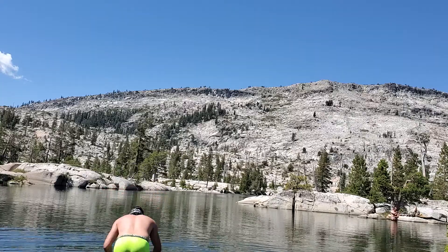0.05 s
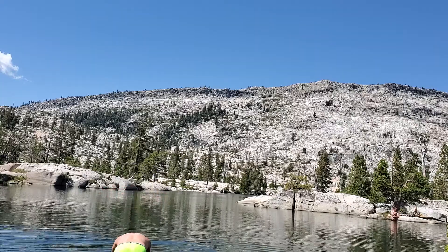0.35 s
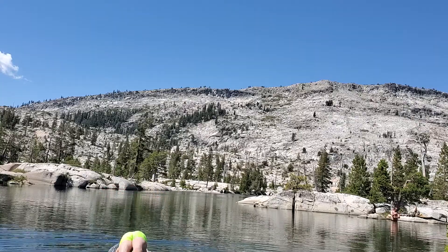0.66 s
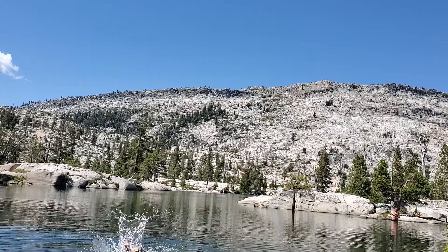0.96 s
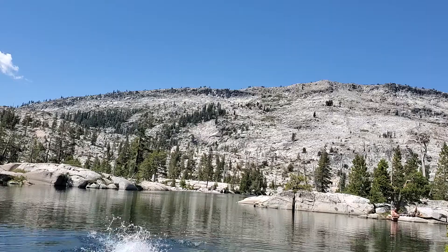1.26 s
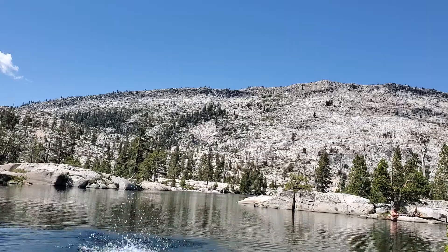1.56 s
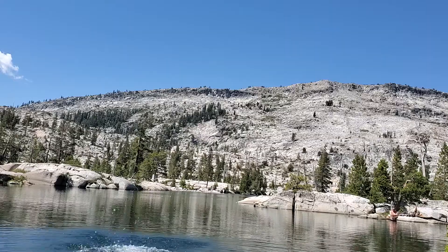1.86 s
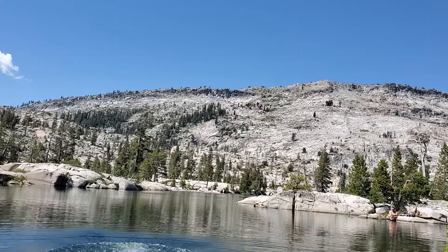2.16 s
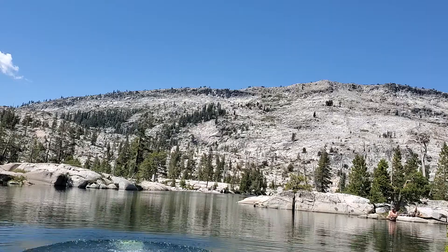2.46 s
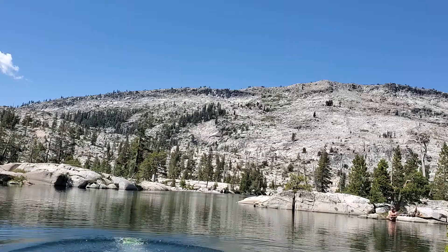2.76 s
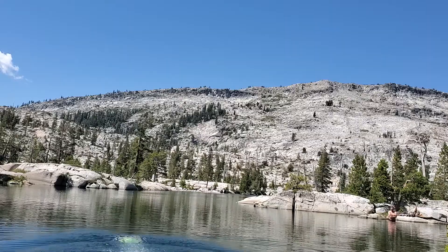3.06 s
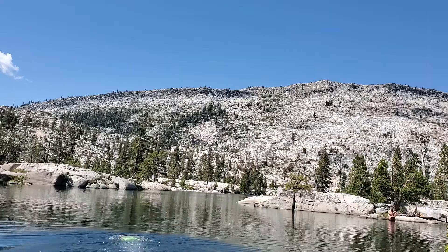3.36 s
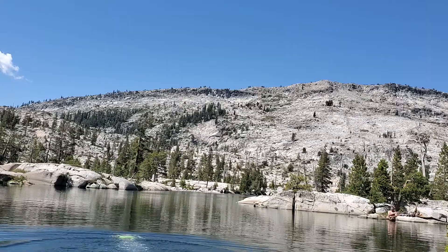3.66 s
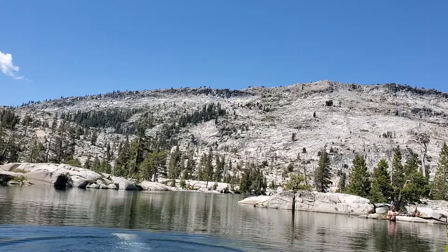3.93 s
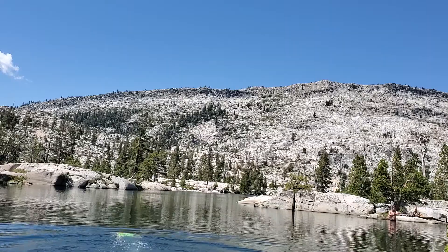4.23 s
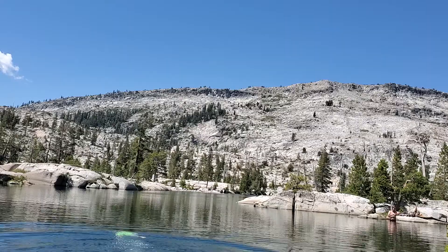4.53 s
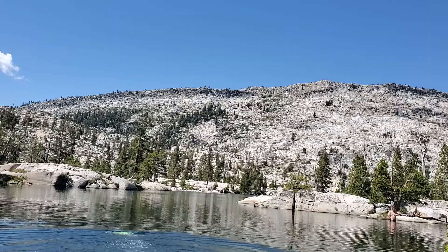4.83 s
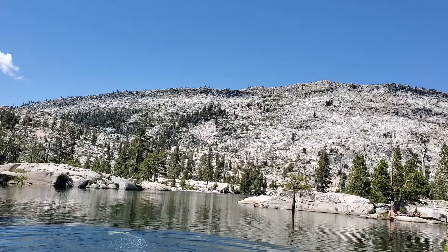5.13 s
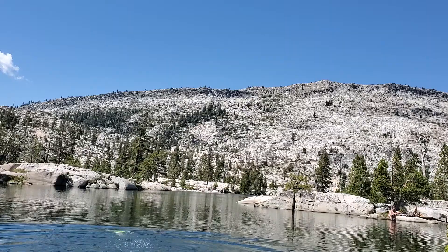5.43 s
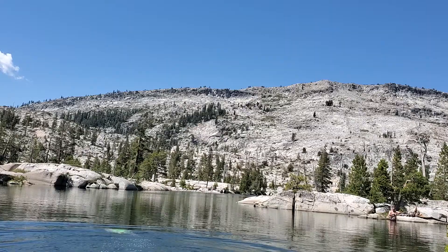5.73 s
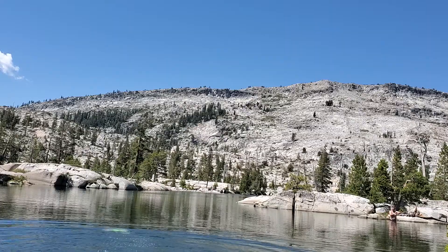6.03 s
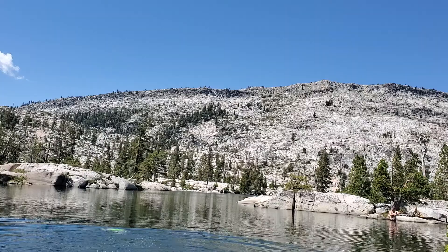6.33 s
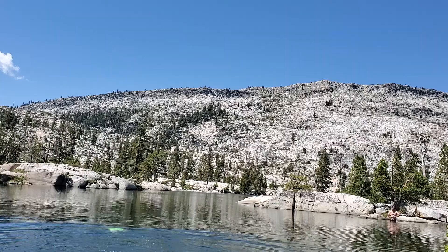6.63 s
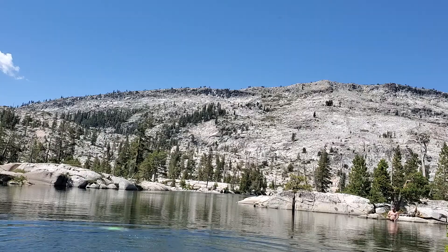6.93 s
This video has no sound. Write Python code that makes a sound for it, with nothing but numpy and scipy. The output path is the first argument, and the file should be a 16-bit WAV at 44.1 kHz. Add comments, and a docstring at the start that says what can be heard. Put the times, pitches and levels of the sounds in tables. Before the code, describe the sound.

Over a low rumble of open air, a person dives headfirst into a mountain lake. The body slaps the surface, the water churns with deep plops and thumps, and fizzing spray patters back down. A few bubbles rise, then faint ripples lap against the rocks. The splash is heard from a few metres away, slightly to the left, with a short, slight echo off the shore.

```python
"""First comes a low rumble of open air, then a person dives headfirst into a mountain lake.
The body slaps in, the air pocket it drags down churns and collapses in thumps, and spray patters back.
Then a few bubbles surface and ripples lap the rocks. Most of the water's sound is trapped air ringing:
big bubbles ring low and long, small ones high and short. Two microphone ports listen a few metres away."""
import sys
import numpy as np
from scipy import signal
from scipy.fft import rfft, irfft, next_fast_len
from scipy.io import wavfile
from scipy.ndimage import uniform_filter1d

SR = 44100
rng = np.random.default_rng(int(sys.argv[2]) if len(sys.argv) > 2 else 0)


def inscribe(sig):
    """Save sig as 16-bit PCM at rate SR to the path in sys.argv[1].

    A 1-D sig is mono; a 2-D sig holds one channel per row.
    Samples are clipped to [-1, 1] before scaling.
    """
    pcm = np.round(np.clip(np.atleast_2d(sig).T, -1, 1) * 32767)
    wavfile.write(sys.argv[1], SR, pcm.astype(np.int16))


N = 317079
TIME = np.arange(N) / SR

# How strong the lows and highs of each sound are. Each row: frequency in Hz, relative level in dB.
RUMBLE_COLOUR = [(15, -48.5), (25, -19.5), (63, -3.5), (94, -0.5), (131, -7.5), (201, -11), (237, -16),
                 (290, -14.5), (328, -17), (411, -17.5), (806, -26.5), (1030, -26), (1790, -27.5),
                 (2800, -35.5), (3300, -48.5), (4290, -76), (7260, -120)]
HISS_COLOUR = [(1940, -35), (3300, -17.5), (3920, -13), (5040, -15.5), (5710, -12.5), (6870, -7),
               (8490, -25.5), (9310, -16), (12800, -7.5), (14400, -6.5), (15200, -3), (16000, -2.5)]
CHURN_COLOUR = [(60, 4), (120, -6.5), (170, -2.5), (260, 0.5), (340, 1.5), (440, 3), (550, -2), (650, -4.5),
                (760, -15.5), (850, -18), (1200, -40)]
SPLASH_COLOUR = [(440, 1), (750, 0), (836, -16), (965, -6.5), (1160, -0.5), (1330, -4), (1430, -1),
                 (1900, -5.5), (2090, -3.5), (2390, -10), (2810, -11.5), (3410, -20), (4200, -21.5),
                 (5460, -29), (9240, -120)]
SPRAY_COLOUR = [(2000, -9), (3400, -7), (4270, -3), (5210, -6), (6670, -6), (7890, -15), (11500, -7),
                (13000, -7), (14500, -2), (15200, 0.5), (16000, -26)]
SLAP_COLOUR = [(100, -15), (250, -8), (550, -9.5), (820, -11), (1150, -7), (2400, -8.5), (3500, -17),
               (8000, -29), (15000, -18)]
LAP_COLOUR = [(450, -5), (700, 8.5), (900, -11), (1300, 3), (2400, 2), (3300, -8), (6000, -9)]
# The hiss comes up with the splash. Each row: time in seconds, change of level in dB.
HISS_RISE = [(0, -4), (.22, -2), (.5, 18), (2.8, 5), (3.8, 1.5), (6.4, 2), (7.15, -1)]
# Single air pockets and bubbles. Each row: start in seconds, relative level in dB, pitch in Hz.
PLOPS = [(.241, -38.5, 1140), (.25, -47, 2980), (.3802, -23.5, 4600), (.382, -33.5, 3000),
         (.435, -25, 2740), (.461, -34, 2400), (.656, -12, 2090), (.651, -30.5, 71), (.705, -26, 85),
         (.767, -16, 1150), (.771, -27, 80), (.797, -14.5, 240), (.830, -18.5, 176), (.845, -15.5, 264),
         (1.051, -17, 420), (1.072, -11.5, 1256), (1.089, -24.5, 54.4), (1.093, -10, 498),
         (1.175, -18.5, 82), (1.275, -15.5, 327), (1.277, -16.5, 51), (1.765, -26.5, 2240),
         (1.913, -33, 1680), (2.132, -27, 2020), (2.294, -32, 2450), (2.486, -40, 2900),
         (5.107, -42.5, 690), (5.244, -49, 2290), (5.659, -43, 2210), (6.338, -46.5, 875),
         (6.617, -40.5, 1980), (6.631, -44.5, 484), (6.633, -42.5, 1510), (6.647, -42, 2220),
         (6.694, -50, 705), (7.156, -41, 1150)]
# The largest drops landing. Each row: start in seconds, relative level in dB, pitch in Hz.
BIG_DROPS = [(.252, -50, 5000), (.331, -45.5, 5000), (.3795, -28.5, 5950), (.4125, -30.5, 13200),
             (.5442, -31, 11800), (.8639, -35, 6500), (1.2211, -24.5, 12400), (1.8367, -32, 13000),
             (1.924, -39, 6040), (1.9789, -37, 4600), (2.089, -38, 5000), (2.1186, -32, 11000),
             (2.2069, -35, 5560), (2.221, -36.5, 6540), (2.3206, -32, 6400), (2.3456, -34, 11000),
             (2.377, -31, 11200), (2.4144, -37, 6450), (2.426, -31.5, 9900), (2.5416, -34.5, 6800),
             (2.605, -24.5, 12600), (2.613, -36, 12600), (2.6375, -41, 11250), (2.6663, -33, 14200),
             (2.7362, -41.5, 12500), (5.659, -52, 8900), (6.609, -44.5, 5740), (6.625, -41, 12500)]
# The slow swell of each splash layer. Each lists: relative level in dB, time it is full in seconds,
# hold in seconds, rise and fall in dB per second.
CHURN_WASH = (-35, 0.6, 0.65, 34.5, 23)
SPLATTER_WASH = (-36.5, 0.516, 1.0746, 30, 30)
SPRAY_WASH = (-48, 1.25, 0.35, 9, 17)
# Surges as the diver pushes off and enters, the air pocket closes and spray falls back. Each row:
# crest in seconds, relative levels of churn, splatter and spray in dB, rise and fall in dB per second.
SURGES = [(.335, -52, -53.5, -75, 110, 44.5), (.615, -29, -34, -44, 260, 130),
          (.663, -35, -26.5, -40, 170, 120), (.783, -23.5, -37, -38.5, 300, 190),
          (.825, -23.5, -41, -58, 260.5, 75), (.965, -27.5, -46, -60, 138.5, 130.5),
          (1.005, -42, -34, -44.5, 230, 34), (1.098, -25.5, -24.5, -50, 130, 240),
          (1.19, -35, -37, -55, 299.5, 90), (1.29, -29.5, -32.5, -49, 330.5, 110),
          (1.84, -50, -45, -60, 160, 110), (2.125, -56, -54, -52.5, 200, 45),
          (2.28, -72.5, -52.5, -59, 170, 110.5), (2.43, -72, -64, -54, 75, 40)]
# Flat blows of body and falling water on the surface. Each row: start in seconds, relative level
# in dB, seconds to fade by 60 dB (called t60 below), frequency in Hz above which it is dulled.
SLAPS = [(0.4365, -32, 0.039, 4970), (.460, -26.5, 0.03, 5030), (0.648, -21.5, 0.038, 6000),
         (0.762, -22.5, 0.046, 12100), (0.767, -19, 0.021, 9000), (1.0728, -21, 0.025, 2200),
         (1.088, -20, 0.045, 1800), (1.103, -17, .025, 1900), (1.285, -21.5, .07, 3000),
         (2.13, -30.5, 0.037, 4000), (6.622, -55, 0.28, 13000)]
# Bubbles nearing the surface. Each row: start and length in seconds, first and last pitch in Hz,
# relative level in dB.
RISING_BUBBLES = [(2.066, .085, 369, 480, -47.5), (2.642, 0.087, 976, 1710, -62.5),
                  (2.759, .038, 548, 1470, -56), (3.125, .08, 361, 1387, -57)]
# Ripples reaching the rocks. Each row: crest in seconds, relative level in dB.
LAPS = [(5.03, -73), (5.28, -68), (5.45, -67.5), (5.70, -69), (5.94, -72), (6.30, -67), (6.65, -62),
        (6.92, -74)]
# Which port is louder. Each row: frequency in Hz, left minus right in dB.
PORT_BALANCE = [(60, 1), (230, 1), (500, 0.5), (770, 0), (1150, 6), (2000, 5), (3200, 9.5), (4300, 0),
                (6000, 1.5), (7100, -5), (8500, 3), (12000, -1.5), (14500, 16.5)]
# How far the left port is ahead. Each row: frequency in Hz, phase lead in radians.
LEFT_LEAD = [(60, 0.087), (400, 0.13), (1000, 1.1), (2200, 1.1), (4000, 1.48)]
# How alike the two ports hear water and air. Each row: frequency in Hz, likeness from 0 to 1.
WATER_LIKENESS = [(100, 1), (500, 1), (1200, 0.68), (2200, 1), (4500, 0.82), (8000, 0.19), (15000, .05)]
AIR_LIKENESS = [(60, 0.98), (240, 0.91), (480, 0.69), (1200, 0.45), (2200, 0.23), (4000, 0.047)]

ENTRY_S, LANDED_S = .48, 2.45  # the water is in uproar from the diver's entry until the spray has landed


def gain_of(db):
    """Turns decibels into a number to multiply a sound by."""
    return 10 ** (np.asarray(db) / 20)


def evened(x):
    """Scales a sound to an average (rms) level of 1."""
    return x / np.sqrt(np.mean(x ** 2) + 1e-20)


def read(table, hz):
    """Looks up a frequency in a table, blending between rows on a pitch-like (log) scale."""
    row_hz, value = np.transpose(table)
    return np.interp(np.log(hz + 1), np.log(row_hz + 1), value)


def filtered(x, response):
    """Multiplies each frequency in a sound by response(hz)."""
    size = next_fast_len(N + 4096, True)
    return irfft(rfft(x, size) * response(np.fft.rfftfreq(size, 1 / SR)), size)[..., :N]


def coloured(x, colour):
    """Shapes a sound's lows and highs with a colour table, at an average level of 1."""
    return evened(filtered(x, lambda hz: gain_of(read(colour, hz))))


def add(mix, s, sound):
    """Mixes a sound in, starting at s seconds."""
    part = mix[:, max(round(s * SR), 0):][:, :sound.shape[-1]]
    part += sound[..., :part.shape[1]]


def swell(s, rise_db_per_s, fall_db_per_s, hold_s=0):
    """A loudness curve that rises to 1 at s seconds, holds, and falls."""
    before, after = np.maximum(s - TIME, 0), np.maximum(TIME - s - hold_s, 0)
    return gain_of(-rise_db_per_s * before - fall_db_per_s * after)


def air(rumble_db=-51.5, hiss_db=-72, lag_s=.00018, stirred_db=3):
    """Open air rumbles from the left, more while the lake is stirred, under a faint hiss."""
    left, other = rng.standard_normal((2, N))
    shared = filtered(left, lambda hz: read(AIR_LIKENESS, hz) * np.exp(-2j * np.pi * hz * lag_s))
    separate = filtered(other, lambda hz: np.sqrt(1 - read(AIR_LIKENESS, hz) ** 2))
    pair = np.array([left, shared + separate])
    stirred = swell(ENTRY_S, rise_db_per_s=85, fall_db_per_s=40, hold_s=1.7)
    rumble = gain_of(rumble_db + stirred_db * stirred) * coloured(pair, RUMBLE_COLOUR)
    hiss = gain_of(hiss_db + np.interp(TIME, *np.transpose(HISS_RISE))) * coloured(pair, HISS_COLOUR)
    return rumble + hiss * gain_of([[3.5], [0]])  # more hiss on the left


def ring(t, hz, t60, rise, phase=0):
    """A pocket of air starts ringing within half a cycle, then dies away while its pitch climbs."""
    age = t / t60
    loudness = (1 - np.exp(-4 * hz * t)) * gain_of(-60 * age)
    climb = 1 + rise * np.minimum(age, 2)
    return loudness * np.sin(2 * np.pi * hz * t * climb + phase)


def plops(t60_at_1khz=.023):
    """Single air pockets ring, big ones longest; the deep ones are the hole behind the diver closing."""
    out, t = np.zeros((2, N)), np.arange(SR // 3) / SR
    for s, db, hz in list(PLOPS) + ripple_plips():
        tone = ring(t, hz, t60_at_1khz * (1000 / hz) ** .69, rise=.017)
        add(out, s, gain_of(db - 2) * tone / abs(tone).max())
    return out


def drops(cycles=.61, patter_db=-25, patter_s=.0035):
    """A drop ticks for a few cycles; the droplets it throws patter briefly around the same pitch."""
    out, t = np.zeros((2, N)), np.arange(SR // 40) / SR
    for s, db, hz in list(BIG_DROPS) + small_drops():
        age = t * hz / cycles
        loudness = (age / 2) ** 2 * np.exp(2 - age)
        tick = loudness * np.sin(2 * np.pi * (hz * t + rng.random((2, 1)) / 2))
        patter = gain_of(patter_db) * rng.standard_normal((2, len(t))) * np.exp(-t / patter_s)
        hits = (t == 0) + patter  # the drop itself, then its droplets
        add(out, s + .0023, gain_of(db) * signal.fftconvolve(tick, hits, axes=1))
    return gain_of(1.5) * out


def agitation(wash, surges_db):
    """How loud one splash layer is over time: a slow swell plus surges, until the spray has landed."""
    db, full_s, hold_s, build, settle = wash
    entered, landed = swell(ENTRY_S, 190, 0), swell(LANDED_S, 0, 110)
    parts = [gain_of(db) * swell(full_s, build, settle, hold_s) * entered]
    for crest_db, (s, *_, rise, fall) in zip(surges_db, SURGES):
        parts.append(gain_of(crest_db) * swell(s, rise, fall))
    return np.linalg.norm(parts, axis=0) * landed  # the parts add in power


def swarm(loudness, colour, low_hz, high_hz, cycles, spread_db, crowding, count):
    """Many bubbles of random size ring; they crowd together when the water is loud."""
    when, pitch, size, phase = rng.random((count, 4)).T
    running_total = np.cumsum(loudness ** crowding)
    start = np.searchsorted(running_total, when * running_total[-1])
    hz = low_hz * (high_hz / low_hz) ** pitch
    height = gain_of(spread_db * np.minimum(-np.log(1 - size), 3.5)) * hz / low_hz
    # bubbles lie all over the splash, so each reaches the right port with its own phase
    skew = rng.standard_normal(count) * np.sqrt(-2 * np.log(read(WATER_LIKENESS, hz)))
    step = np.arange(int(.7 * cycles * SR / low_hz))
    out = np.zeros((2, N))
    for port in (0, 1):
        port_phase = (2 * np.pi * phase + port * skew)[:, None]
        tones = height[:, None] * ring(step / SR, hz[:, None], cycles / hz[:, None], .21, port_phase)
        out[port] = np.bincount((start[:, None] + step).ravel(), tones.ravel(), N)[:N]  # mix them all
    out = coloured(out, colour)
    # even out the level, so that it follows the loudness curve
    power = uniform_filter1d(uniform_filter1d((out ** 2).mean(0), size=1800), size=1800)
    return loudness * out / np.sqrt(abs(power) + 1e-3)


def churn(loudness, deep_s=.83, deep_below_hz=230):
    """Large bubbles ring under the surface; their bass comes in as the diver drags air deep."""
    bubbles = swarm(loudness, CHURN_COLOUR, low_hz=111.5, high_hz=860,
                    cycles=11, spread_db=2.5, crowding=.35, count=1000)
    bass = filtered(bubbles, lambda hz: 1 / (1 + (hz / deep_below_hz) ** 6))
    bass_gain = gain_of(1.5) * swell(deep_s, 32, 0)
    return bubbles + bass * (bass_gain - 1)


def splash(mist_db=-5, spray_share=.4):
    """Large bubbles churn below, smaller ones splatter and crackle on top, fine spray fizzes above."""
    _, churn_db, splatter_db, spray_db, _, _ = np.transpose(SURGES)
    splashing, thrown = agitation(SPLATTER_WASH, splatter_db), agitation(SPRAY_WASH, spray_db)
    churning = churn(agitation(CHURN_WASH, churn_db))
    splatter = swarm(splashing, SPLASH_COLOUR, low_hz=744, high_hz=2400,
                     cycles=15.3, spread_db=2.5, crowding=.4, count=4200)
    # mid-sized bubbles come partly from the splashing and partly from the spray landing
    landing = splashing ** (1 - spray_share) * thrown ** spray_share
    crackle = swarm(landing, SPLASH_COLOUR, low_hz=2400, high_hz=4210,
                    cycles=21, spread_db=2.5, crowding=.98, count=3500)
    spray = swarm(thrown, SPRAY_COLOUR, low_hz=3580, high_hz=15900,
                  cycles=10.7, spread_db=3, crowding=1.65, count=8000)
    # the smallest droplets merge into a smooth mist
    mist = gain_of(mist_db) * thrown * coloured(rng.standard_normal((2, N)), SPRAY_COLOUR)
    return gain_of(-1) * (churning + spray + mist) + gain_of(-.5) * splatter + gain_of(-4) * crackle


def slaps(attack_s=.001):
    """Each blow bursts a sheet of water into a short crack; those deep in the air pocket are duller."""
    out, t = np.zeros((2, N)), np.arange(SR // 4) / SR
    noise = coloured(rng.standard_normal(N) + .21 * rng.standard_normal((2, N)), SLAP_COLOUR)
    for s, db, t60, top_hz in SLAPS:
        loudness = gain_of(db - 60 * t / t60) * (1 - np.exp(-t / attack_s))
        crack = loudness * noise[:, round(s * SR):][:, :len(t)]
        add(out, s, signal.lfilter(*signal.butter(2, top_hz, fs=SR), crack))
    return out


def thud(start_s=.7703, db=-8):
    """The diver's trunk hits the water with one short thud."""
    out, t = np.zeros((2, N)), np.arange(SR // 3) / SR
    tone = ring(t, hz=480, t60=.017, rise=.025)
    add(out, start_s, gain_of(db) * tone / abs(tone).max())
    return out


def small_drops(count=22, from_s=1.97, for_s=.55, fade_db_per_s=4, low_hz=4000, high_hz=12100):
    """Smaller drops land at random as the spray thins out. Gives rows like those of BIG_DROPS."""
    when, size, pitch = rng.random((count, 3)).T
    late_s = when * for_s
    db = -39 - fade_db_per_s * late_s + 10 * (size - .5)
    return list(zip(from_s + late_s, db, low_hz * (high_hz / low_hz) ** pitch))


def rising_bubbles(waver=.057, flutter_db=4.5, fade_db=4):
    """Late bubbles whistle upward, unsteadily, on their way to the surface."""
    out = np.zeros((2, N))
    for s, length_s, first_hz, last_hz, db in RISING_BUBBLES:
        hz = np.geomspace(first_hz, last_hz, round(length_s * SR))
        wobble = evened(uniform_filter1d(rng.standard_normal(len(hz)), size=150))
        tone = np.sin(2 * np.pi * np.cumsum(hz * (1 + waver * wobble)) / SR)
        loudness = gain_of(db + flutter_db * wobble - fade_db * np.linspace(0, 1, len(hz)))
        add(out, s, loudness * signal.windows.tukey(len(hz), .3) * tone)
    return out


def lapping(rise_db_per_s=150, fall_db_per_s=90):
    """Ripples fold small bubbles in against the rocks, whose hollows blur them."""
    waves = [gain_of(db) * swell(s, rise_db_per_s, fall_db_per_s) for s, db in LAPS]
    ripples = swarm(np.linalg.norm(waves, axis=0), LAP_COLOUR, low_hz=508, high_hz=4000,
                    cycles=26, spread_db=6.5, crowding=.6, count=700)
    return gain_of(-1.5) * rock_echo(ripples, wet_db=-9.5, t60=.07)


def ripple_plips(count=4, span_s=.16, spread_db=7, low_hz=1000, high_hz=2780):
    """Each ripple pinches off a few bubbles around its crest. Gives rows like those of PLOPS."""
    return [(s + span_s * (when - .5),
             db + 16 + spread_db * (size - .5),
             low_hz * (high_hz / low_hz) ** pitch)
            for s, db in LAPS for when, size, pitch in rng.random((count, 3))]


def rock_echo(x, wet_db=-21, t60=.23):
    """The near rocks scatter a short echo with little bass or treble."""
    t = np.arange(SR // 2) / SR
    bounces = rng.standard_normal((2, len(t))) * (t > .004) * gain_of(-60 * t / t60)
    tail = signal.lfilter(*signal.butter(1, [500, 4500], "bandpass", fs=SR), bounces)
    return x + gain_of(wet_db) * signal.fftconvolve(x, tail / np.linalg.norm(tail[0]), axes=1)[:, :N]


def scene():
    """The water sounds and their echo from the rocks, in open air."""
    water = splash() + lapping() + plops() + thud() + slaps() + drops() + rising_bubbles()
    return rock_echo(water) + air()


def ports(hz):
    """The housing delays the right port and mostly shades it; the sum of both keeps its level."""
    tilt, lead = gain_of(read(PORT_BALANCE, hz) / 2), read(LEFT_LEAD, hz)
    middle = np.sqrt(tilt ** 2 + tilt ** -2 + 2 * read(WATER_LIKENESS, hz) * np.cos(lead)) / 2
    return np.array([tilt * np.exp(.5j * lead), np.exp(-.5j * lead) / tilt]) / middle


def record(dry, low_cut_hz=40, high_cut_hz=16000):
    """The two microphone ports hear the scene; the deepest bass and highest treble are cut away."""
    heard = signal.lfilter(*signal.butter(4, low_cut_hz, "highpass", fs=SR), filtered(dry, ports))
    treble_cut = signal.firwin(511, high_cut_hz, window=("kaiser", 9), fs=SR)
    return signal.oaconvolve(heard, treble_cut[None], "same", axes=1)


dry = scene()
out = record(dry)
inscribe(out)
```